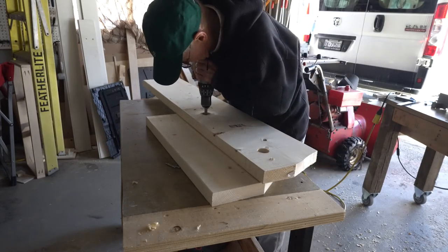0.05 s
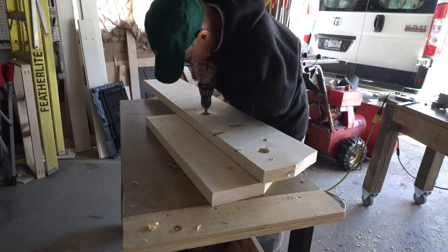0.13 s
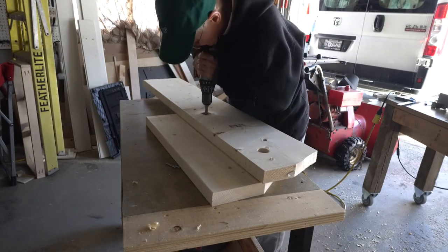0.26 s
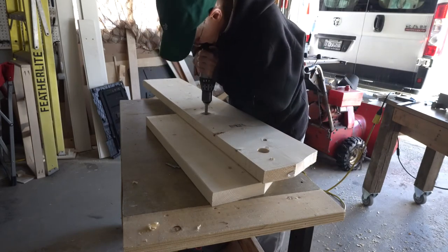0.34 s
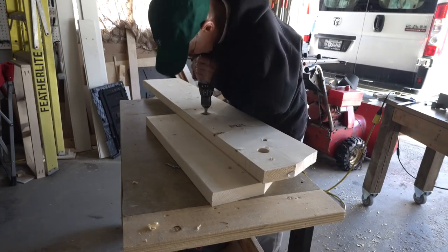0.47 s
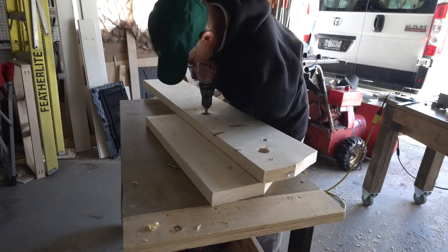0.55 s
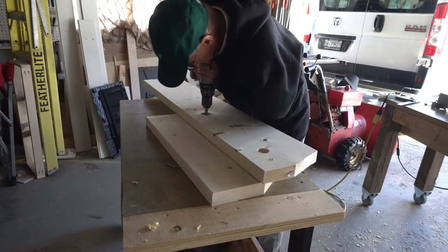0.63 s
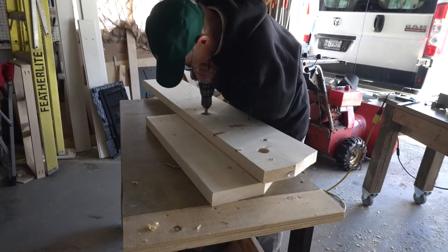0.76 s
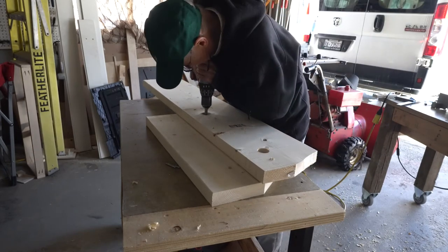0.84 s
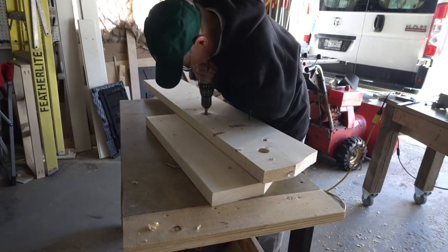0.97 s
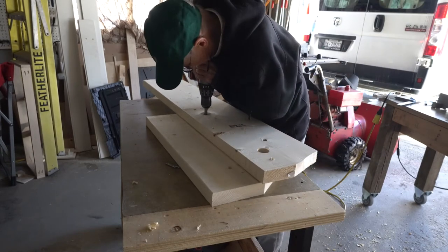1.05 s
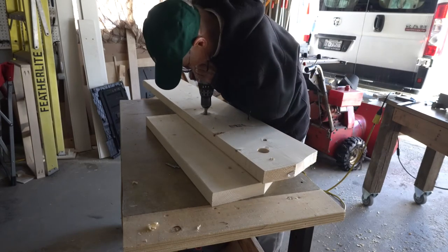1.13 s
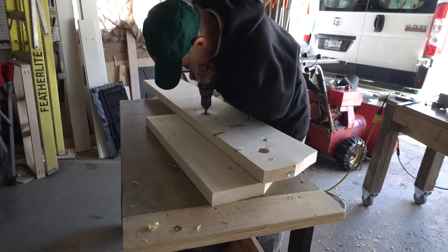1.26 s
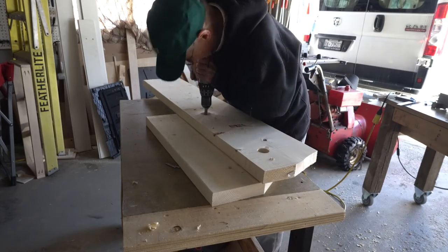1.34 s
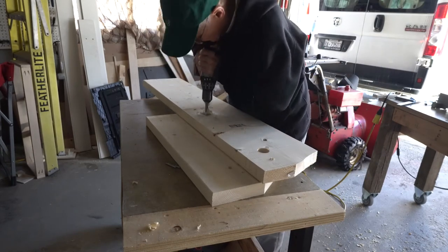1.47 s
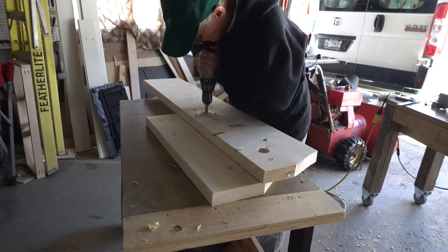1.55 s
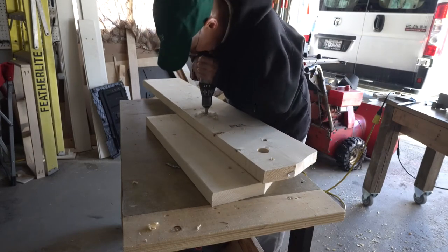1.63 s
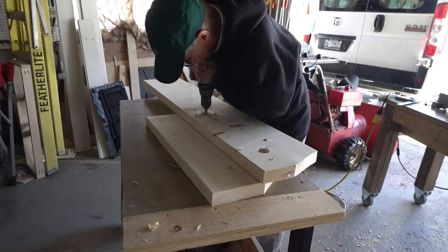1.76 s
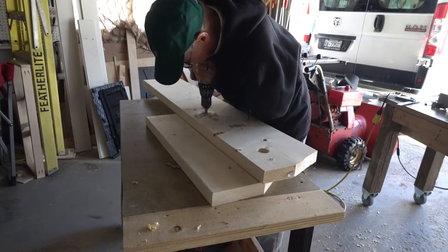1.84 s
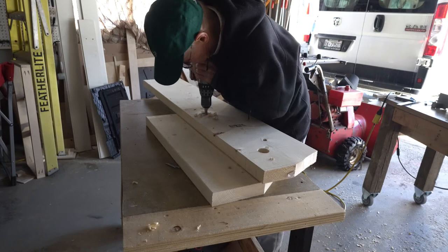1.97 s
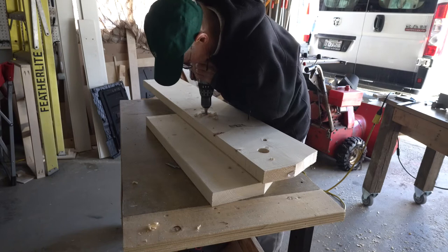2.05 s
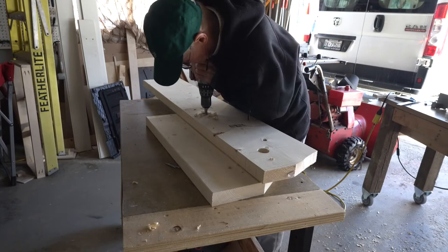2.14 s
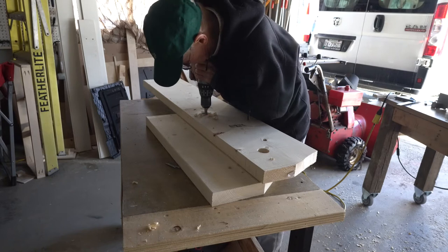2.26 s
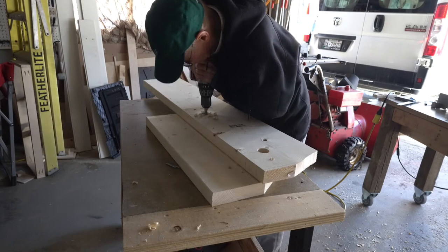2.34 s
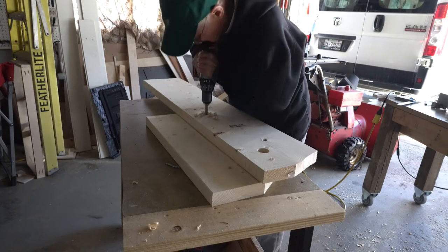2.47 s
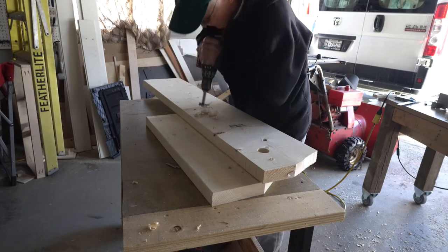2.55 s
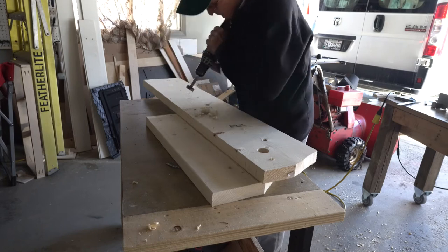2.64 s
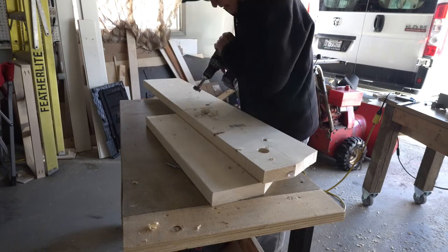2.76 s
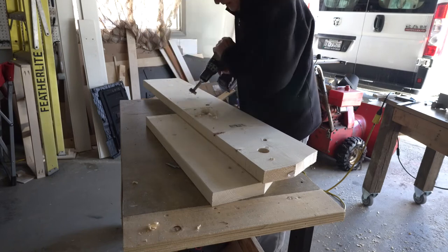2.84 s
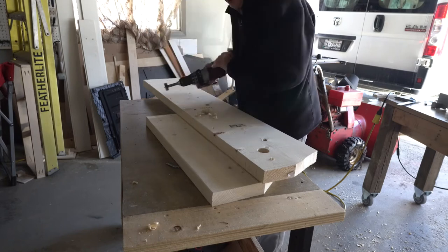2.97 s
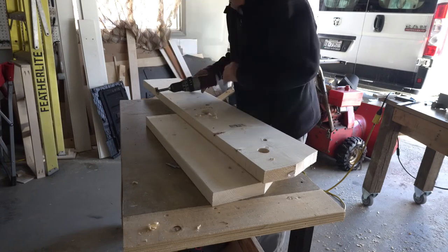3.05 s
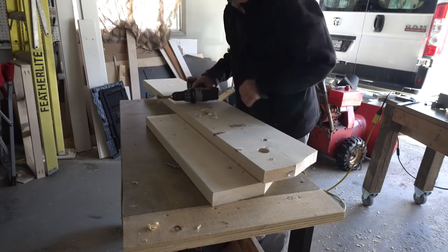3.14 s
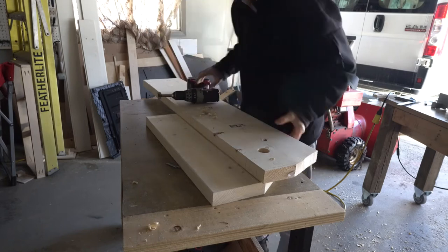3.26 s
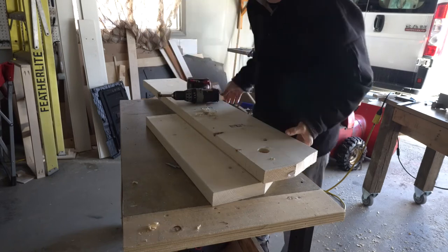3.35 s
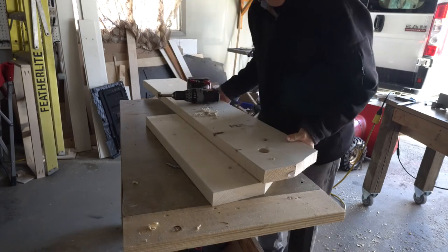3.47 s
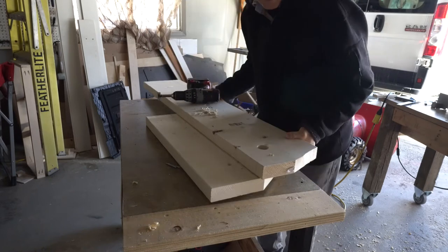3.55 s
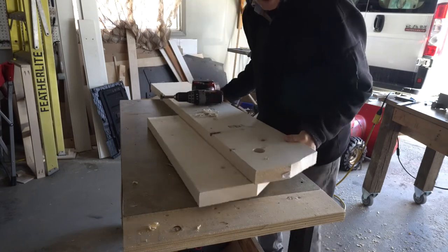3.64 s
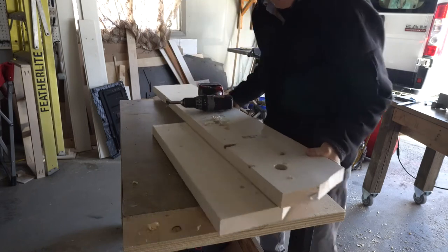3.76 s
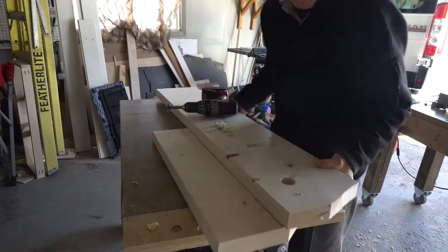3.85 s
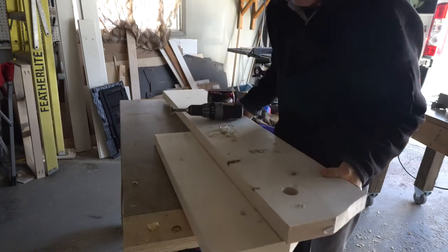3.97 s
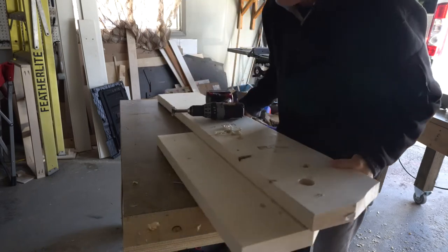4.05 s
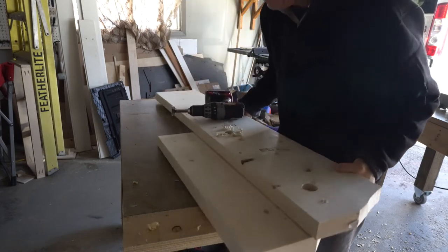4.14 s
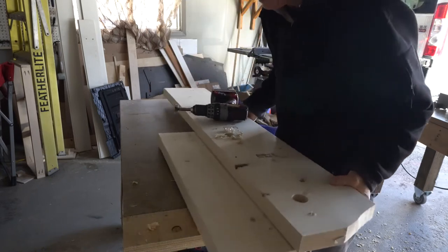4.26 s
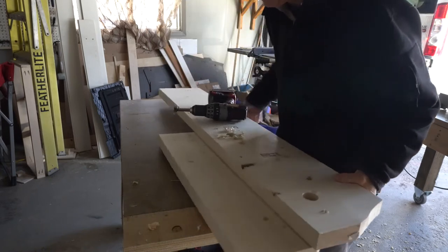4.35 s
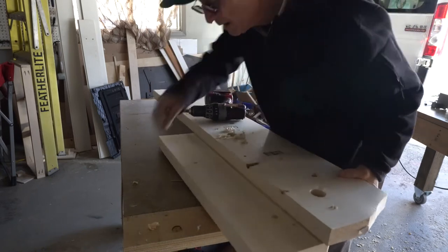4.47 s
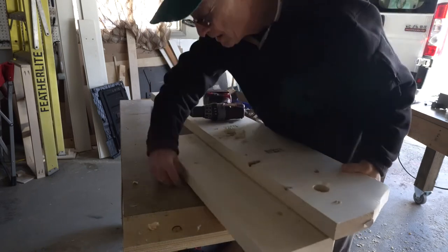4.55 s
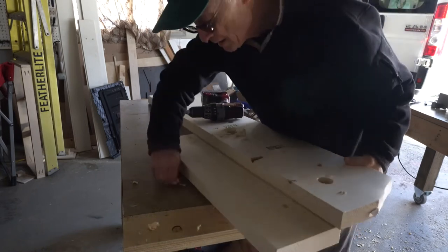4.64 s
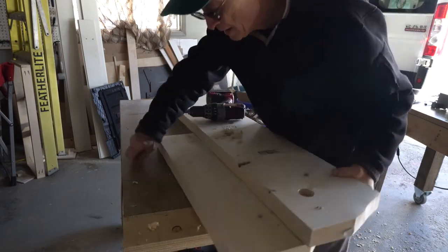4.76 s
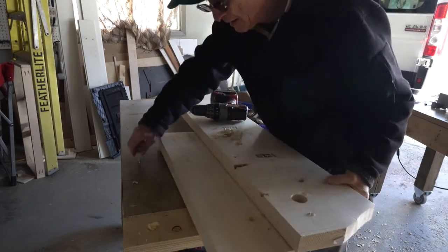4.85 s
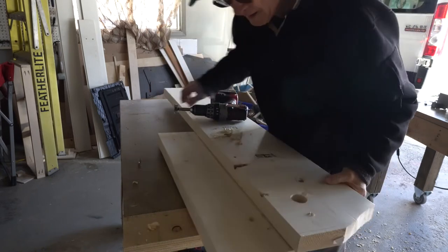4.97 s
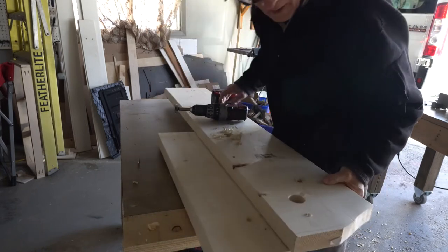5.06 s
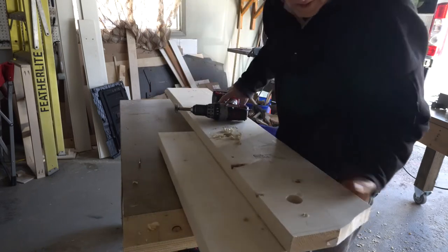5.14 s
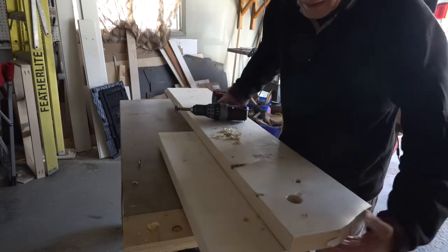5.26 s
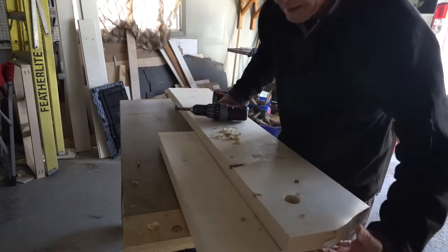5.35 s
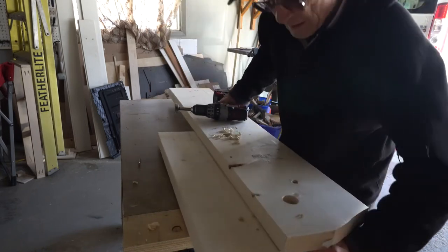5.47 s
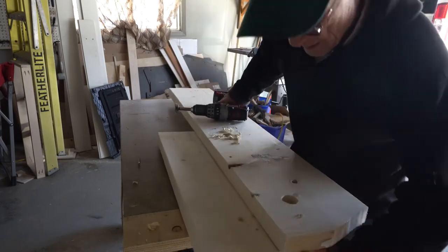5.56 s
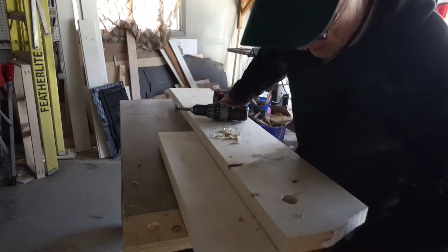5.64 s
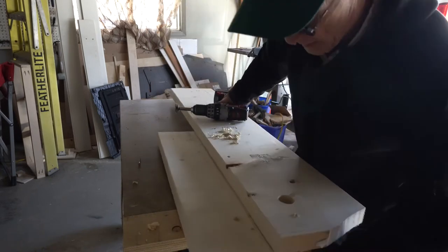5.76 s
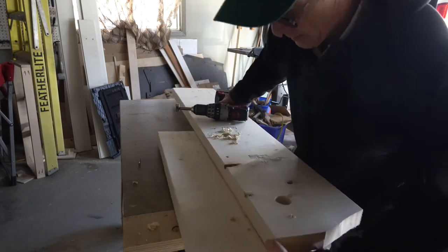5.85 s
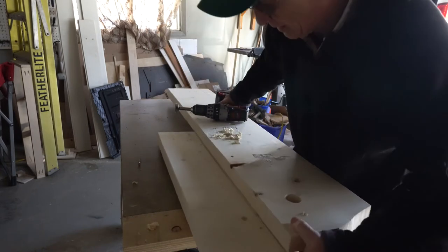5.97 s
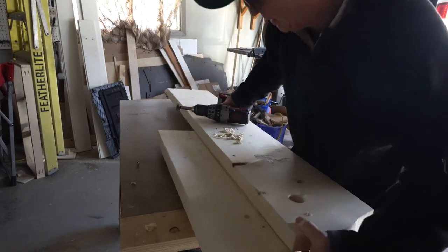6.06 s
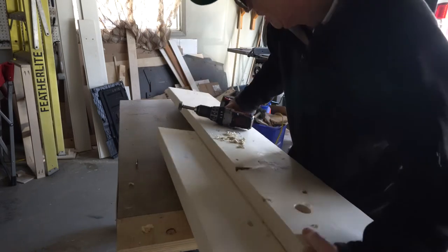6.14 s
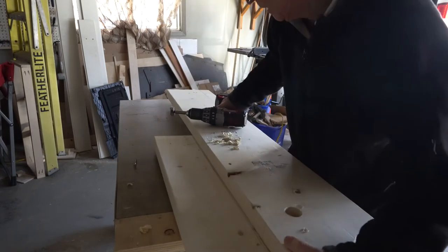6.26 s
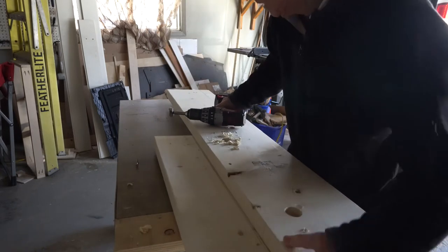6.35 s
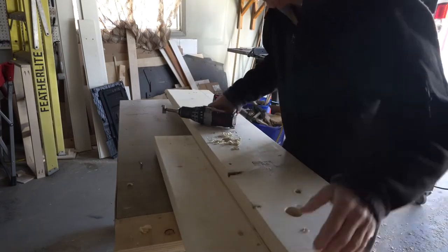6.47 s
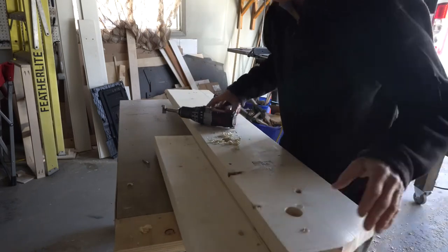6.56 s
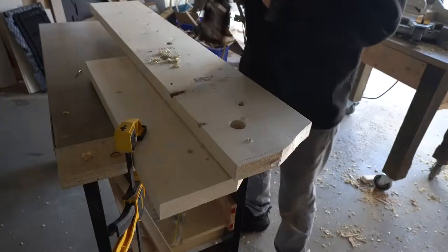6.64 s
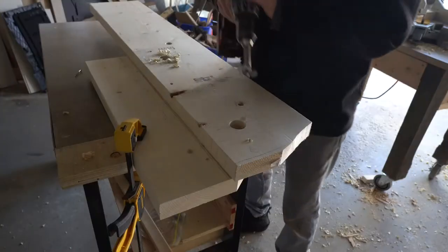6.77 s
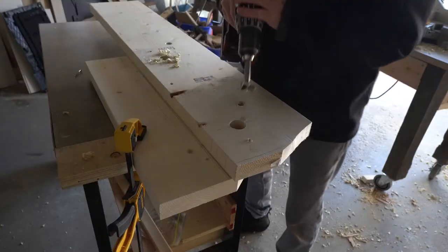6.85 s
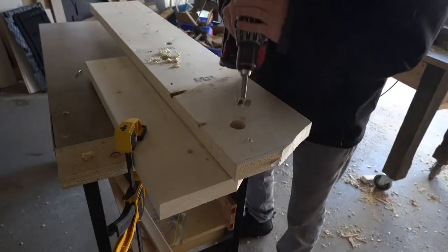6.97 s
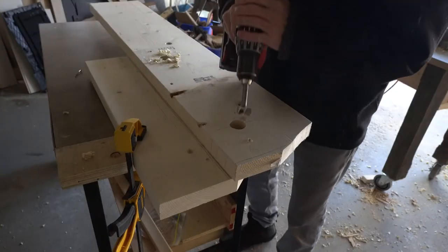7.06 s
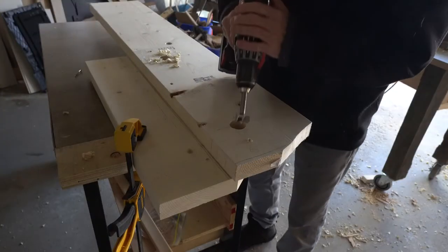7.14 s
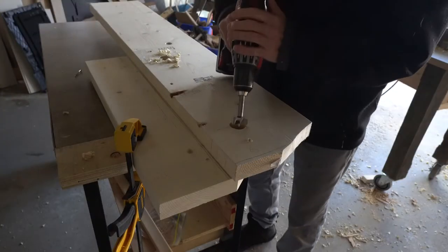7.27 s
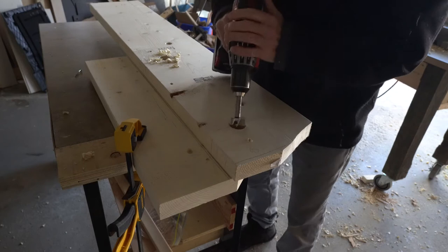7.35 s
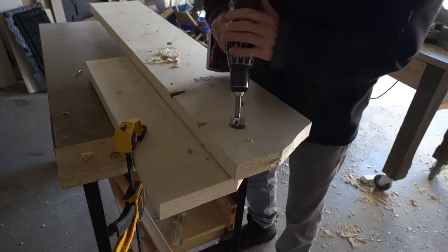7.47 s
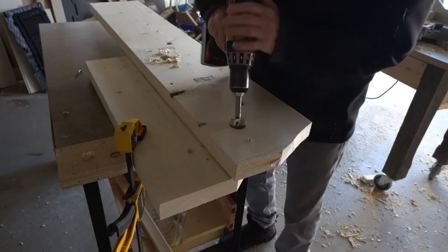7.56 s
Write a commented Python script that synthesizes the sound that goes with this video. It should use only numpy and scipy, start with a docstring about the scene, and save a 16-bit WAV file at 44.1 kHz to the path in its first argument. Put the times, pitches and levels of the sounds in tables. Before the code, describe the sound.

High gear whine and gritty boring into wood, lifting twice between bites, then a tool set down, wooden knocks, scraping and swishing shavings.

```python
"""Workshop, one microphone, the same signal in both channels; a faint air noise lies under everything.
A cordless drill bores a wide bit through a board in three presses, lifted between them. Its gears whine
in tones locked to the motor and hiss; filtered grains make the bit rasp once a turn. As it stops, a faint
gliding tone falls. Then the drill is laid down, boards are dragged and bumped on the bench (noise bursts
ringing wood) and shavings are brushed away (grains and noise). The sound drops out twice after the drill."""
import sys
import numpy as np
from scipy import signal
from scipy.fft import rfft, irfft, next_fast_len
from scipy.io import wavfile

SR = 44100
rng = np.random.default_rng(int(sys.argv[2]) if len(sys.argv) > 2 else 0)


def wav_out(sig):
    """Save sig, one row per channel (or a flat mono array), as 16-bit PCM at SR to the path in sys.argv[1]."""
    wavfile.write(sys.argv[1], SR, np.round(np.clip(np.atleast_2d(sig).T, -1, 1) * 32767).astype(np.int16))


N = 335601

# Spectra set colour only, each scaled to unit power: pitch_hz, level_db (per Hz, relative)
AIR_SPECTRUM = [(25, -19), (70, -13.5), (170, -6.5), (260, -18), (1900, -18.5), (16000, -25)]  # quiet shop
RUMBLE_SPECTRUM = [(25, -19), (60, 1), (120, 8.5), (450, 5), (700, -66)]  # bench under the rubbing
RUB_SPECTRUM = [(300, 4), (500, 5), (1000, 8), (1900, 1), (3000, -1), (5000, -7.5), (9000, -25)]  # wood on wood
BRUSH_SPECTRUM = [(1100, -13), (1800, 8), (2800, 4), (4500, 3.5), (9000, 1), (12000, -0.5), (16000, -2)]  # the finer hiss of the rubbing
GEAR_HISS_SPECTRUM = [(213, -25), (550, -13), (1450, -9), (1620, -13.5), (6000, -14), (8300, -14),
                      (10300, -5.5), (11600, -2.5), (12800, -4.5), (14300, 1), (16000, 2.5)]  # free-running gears
CUT_SPECTRUM = [(230, -47), (340, -5), (480, 3.5), (1000, -2), (2700, -6.5), (9000, -7), (13500, -25),
                (15200, 9.5), (16000, -16)]  # bit in wood, before the board's resonances

AIR_DB = -54.5
# room echo: decay time, level against the direct sound, corner between dull and treble
SHOP_T60_S, SHOP_DB, WALL_CUT_HZ = 0.082, -9.5, 2600

# steady shuffling between the strokes: start_s, rumble_db, rub_db, hiss_db (before the slow fidgeting)
SHUFFLE = [(2.66, -63, -47.5, -67), (3.0, -76, -72, -60), (3.52, -71, -58.5, -53), (4.0, -82, -45.5, -33),
           (4.2, -54, -44.5, -46.5), (4.5, -59, -58, -52), (4.9, -54.5, -49.5, -51), (5.65, -56, -51, -50),
           (6.05, -53, -44.5, -43), (6.45, -49, -44.5, -38), (7.0, -48.5, -41, -47), (7.3, -36.5, -45, -78),
           (7.6, -44, -46, -38)]
# strokes of boards, hands and shavings over wood: start_s, rise_s, hold_s, rub_db, hiss_db
STROKES = [(3.439, 0.014, 0.0071, -45, -41), (3.573, 0.022, 0.027, -43, -35),
           (3.623, 0.082, 0.023, -32.5, -31), (3.703, 0.0058, 0.13, -36.5, -19.5),
           (4.236, 0.019, 0.01, -42, -62), (4.321, 0.028, 0.051, -39.5, -40.5),
           (4.552, 0.021, 0.15, -42.5, -32), (4.662, 0.03, 0.092, -35, -22.5),
           (5.25, 0.0045, 0.012, -46, -32.5), (5.427, 0.027, 0.044, -46.5, -35),
           (5.72, 0.0081, 0.07, -51, -42), (5.936, 0.011, 0.01, -42.5, -36),
           (6.114, 0.012, 0.074, -32.5, -45), (6.552, 0.019, 0.011, -44, -32),
           (7.048, 0.046, 0.0081, -20.5, -27.5), (7.112, 0.022, 0.085, -35.5, -67)]
STROKE_FADE_DB_PER_S = 296
STROKE_RUMBLE_DB = -18  # bench rumble against the rub
# resonances of the rubbed and cracked faces: pitch_hz
FACES = [1870, 2150, 3210, 3820, 4400, 5930, 7850, 8930, 10700, 12400]
# gain of the rubbing's treble: start_s, level_db
TREBLE = [(3.95, -8), (4.5, 2), (5.5, 5), (6.2, -1), (7.0, -6)]

# bumps and knocks: start_s, blow_db, pitch_hz, thud_db, crack_db (relative levels)
KNOCKS = [(0.622, -14, 1000, -65, -10.5), (3.052, -5, 860, -38, -23.5), (3.15, 4.5, 810, -40, -1.5),
          (3.16, -6, 1580, -50, -36), (3.176, -1.5, 1500, -38, -33), (3.707, -13.5, 2470, -40, -3.5),
          (3.746, -15, 2070, -61, -8), (3.823, -11, 2270, -59, -12.5), (3.903, -26, 2000, -64, -27),
          (3.916, -25, 1900, -62, -21), (4.027, -26, 2000, -59, -20), (4.063, 1.5, 1630, -33, -44),
          (4.173, -17, 1060, -32, -23), (4.281, -17.5, 450, -33, -54), (4.294, -24, 1210, -39, -54),
          (4.32, -22.5, 2010, -55, -52), (4.381, -22, 2480, -32, -13.5), (4.39, -20, 2300, -51, -24),
          (4.411, -24.5, 493, -45, -21), (4.538, -23, 2440, -59, -16), (4.579, -21, 2260, -51, -10),
          (4.606, -41, 2820, -57, -20), (4.637, -44, 2300, -52, -14.5), (4.666, 2.5, 2150, -49, -36),
          (4.68, -2.5, 835, -27, -36), (4.807, -5.5, 1340, -27, -40), (4.82, -8.5, 442, -22.5, -49),
          (4.865, -19, 1150, -36, -30), (5.263, -24, 423, -45, -24), (5.32, -35, 2670, -40, -20.5),
          (5.403, -22.5, 2250, -36.5, -25.5), (5.491, -17, 710, -44, -21), (5.497, -22, 424, -38, -8.5),
          (5.738, -46, 2140, -46, -22), (5.821, -22.5, 3040, -43, -50), (5.9, -19.5, 2800, -43, -21),
          (6.116, -9, 1710, -25.5, -45), (6.159, -14, 427, -25, -27), (6.226, -3, 1570, -20, -4.5),
          (6.233, 0.5, 870, -15.5, -30), (6.266, -1.5, 1610, -47, -43), (6.386, 1, 1380, -56, -47),
          (6.81, -32, 470, -35.5, -46), (6.909, -34, 2330, -39, -54), (7.062, -12, 770, -31, -43),
          (7.079, -5.5, 935, -49, -40), (7.092, -4, 855, -41, -25), (7.208, -16, 2360, -33.5, -41),
          (7.211, -7, 440, -12.5, -45), (7.261, -15, 298, -25, -60), (7.367, -15, 585, -20, -61),
          (7.38, -15.5, 3200, -18, -12), (7.453, -31, 2800, -34, -25.5), (7.594, -26, 1020, -37, -44)]
# ring of the boards: pitch_hz, level_db (relative, varied at each blow)
BOARD_MODES = [(420, -4), (570, 2), (690, 0), (815, -2), (1060, -3), (1265, -3), (1570, -4), (1700, -4),
               (1860, -2), (2150, -4), (2780, -8)]
BOARD_T60_S = .05
# ring of the bench: pitch_hz, level_db (relative, varied at each blow), t60_s
BENCH_MODES = [(80.3, -19.5, 0.87), (115.6, -6, 0.12), (162.7, 1.5, 0.11), (188, 1, 0.14), (264, 6, 0.082)]

# faint chirp falling as the chuck stops: start_s, pitch_hz, level_db (before wavering)
CHIRP = [(2.68, 1350, -62), (2.737, 1070, -41), (2.752, 900, -62)]

# motor speed, sagging under load: start_s, gear_mesh_hz (before a slight waver)
MESH = [(0, 6866), (0.13, 6810), (0.21, 7080), (0.3, 7226), (0.45, 7225), (0.59, 6780), (0.86, 6700),
        (0.98, 6790), (1.05, 6690), (1.36, 6860), (1.47, 7180), (1.62, 7229), (1.75, 6950), (1.83, 6790),
        (1.92, 6930), (2.12, 6910), (2.24, 6777), (2.38, 6940), (2.5, 7217)]
TEETH, GEARING = 20, 12  # gear meshes per motor turn, motor turns per chuck turn
FREE_HZ, LOADED_HZ = 7300, 6800  # gear mesh with no load and with full load
# tones on the motor's turn: multiple of the motor speed, level_db (relative, wavering)
FREE_TONES = [(4, -21), (14, -24), (20, -8), (22, -22), (28, -16), (30, -9), (32, -16), (34, -15), (40, -6),
              (42, -18)]
# tones that grow with the load: multiple of the motor speed, level_db (relative, wavering)
LOAD_TONES = [(8.06, -13.5), (10, -22), (45, -6)]
GEARS_DB = -22
RUN_HOLD_S, COAST_DB_PER_S = 2.576, 450  # trigger held, then fade as the brake acts
# the bit pressed into the wood: start_s, hold_s, cutting_db
PRESSES = [(-.1, 0.26, -26), (0.402, 0.97, -26.5), (1.589, 0.814, -26.5)]
BITE_S, LIFT_DB_PER_S = 0.025, 450  # rise as the bit bites, fade as it is lifted
FIRST_BITE, FIRST_BITE_FADE_DB_PER_S = .8, 230  # extra gain as the bit first catches
IDLE_DB = -52.5  # the lifted bit still grazes the hole
# the board sings under the bit: pitch_hz, width_hz, level_db (gain)
BORED_MODES = [(570, 630, -7), (980, 150, 0), (1380, 20, -5), (1706, 63, 8.5), (2243, 110, -0.5)]

# silent stretches: start_s, end_s
DROPOUTS = [(3.143, 3.148), (6.619, 6.661)]
CUTOFF_HZ = 15700


def amp(db):
    """Gain of a level in dB."""
    return 10 ** (np.asarray(db) / 20)


def rms_one(x):
    """Scale to unit power."""
    return x / np.sqrt(np.mean(x ** 2) + 1e-20)


def in_time(rows):
    """Draw each column of a table as a curve over all samples."""
    s, *columns = np.transpose(rows)
    return [np.interp(np.arange(N) / SR, s, c) for c in columns]


def shape(start_s, rise_s, hold_s, fade_db_per_s):
    """Gain that rises, holds, then fades at a steady rate for up to a second."""
    t = np.arange(N) / SR - start_s
    rise = np.clip(t / rise_s, 0, 1) ** 2
    return rise * amp(-fade_db_per_s * np.clip(t - rise_s - hold_s, 0, 1))


def drift(rate):
    """Slow random curve of spread 1, changing about rate times a second."""
    knots_per_s = 400
    knots = rng.standard_normal(int(N / SR * knots_per_s) + 2)
    r = np.exp(-2 * np.pi * rate / knots_per_s)
    slow = signal.lfilter([1], [1, -2 * r, r * r], knots)
    return np.interp(np.arange(N) * knots_per_s / SR, np.arange(len(slow)), rms_one(slow))


def coloured(x, spectrum):
    """Shape x to a spectrum of pitch_hz, level_db, dark outside it; unit power."""
    size = next_fast_len(N)
    hz, level_db = np.transpose(spectrum)
    log_hz = np.log(np.arange(size // 2 + 1) * SR / size + 1)
    gain = amp(np.interp(log_hz, np.log(hz), level_db, left=-80, right=-80))
    return rms_one(irfft(rfft(x, size) * gain, size)[:N])


def grains(per_s, spread_db):
    """Random clicks of uneven size and either sign; unit power."""
    sizes = amp(spread_db * np.minimum(rng.exponential(1, N), 4)) * rng.choice([-1, 1], N)
    return rms_one(sizes * (rng.random(N) < per_s / SR))


def ring(clicks, hz, t60):
    """A unit click sets a decaying sine of starting height 1 ringing."""
    r, w = amp(-60 / (t60 * SR)), 2 * np.pi * hz / SR
    return signal.lfilter([0, np.sin(w)], [1, -2 * r * np.cos(w), r * r], clicks + 1e-18)


def struck(modes, contact):
    """A contact force rings a set of modes, each with a fresh strength."""
    return sum(amp(db + 2.5 * rng.standard_normal()) * ring(contact, hz, t60)
               for hz, db, t60 in modes)


def resonance(x, hz, width_hz):
    """Band-pass with a peak gain of 1."""
    r = np.exp(-np.pi * width_hz / SR)
    poles = [1, -2 * r * np.cos(2 * np.pi * hz / SR), r * r]
    return signal.lfilter(np.array([1, 0, -1]) * (1 - r * r) / 2, poles, x)


def filtered(x, order, hz, kind="low"):
    """Butterworth filter."""
    return signal.sosfilt(signal.butter(order, hz, kind, fs=SR, output="sos"), x)


def shop_air():
    """The quiet shop: steady coloured noise."""
    return amp(AIR_DB) * coloured(rng.standard_normal(N), AIR_SPECTRUM)


def shop_echo(x):
    """Echoes of the shop: convolution with noise that dies away, the treble sooner."""
    t = np.arange(int(.6 * SR)) / SR
    noise = rng.standard_normal(len(t)) * np.clip(t / 0.047, 0, 1)
    dull = filtered(noise, 1, WALL_CUT_HZ)
    tail = dull * amp(-60 * t / SHOP_T60_S)
    tail += (noise - dull) * amp(-60 * t / (0.88 * SHOP_T60_S))
    return signal.fftconvolve(x, tail / np.sqrt(np.sum(tail ** 2)))[:N]


def handling():
    """Wood rubbing on wood: dense slips in two colours with grit and squeaks, and the bench rumbling."""
    # the shuffling fades in, then comes and goes
    on = np.clip((np.arange(N) / SR - SHUFFLE[0][0]) / 0.032 + 1, 0, 1)
    rumble_gain, rub_gain, hiss_gain = (on * amp(db) for db in in_time(SHUFFLE))
    fidget = amp(2.0 * drift(12))
    rub_gain, hiss_gain = rub_gain * fidget, hiss_gain * fidget

    strokes = np.array([shape(s, rise, hold, STROKE_FADE_DB_PER_S) for s, rise, hold, *_ in STROKES])
    rubbing, hissing = amp(np.transpose(STROKES)[3:]) @ strokes

    slips = amp(2.2 * drift(25))
    grit = amp(-3) * grains(450 * slips ** 2, spread_db=2.0)
    rub = coloured((rng.standard_normal(N) + grit) * slips, RUB_SPECTRUM)
    brush = coloured((grains(9000, spread_db=-2.0) + grit) * slips, BRUSH_SPECTRUM)
    # narrow resonances of the rubbed faces come and go
    squeak = sum(amp(7.0 * drift(11)) * resonance(brush, hz, hz / 20) for hz in FACES)
    brush = rms_one(brush + amp(-3) * rms_one(squeak))
    # zero-phase split, so that only the treble changes level
    below = signal.sosfiltfilt(signal.butter(4, 9800, fs=SR, output="sos"), brush)
    treble_db, = in_time(TREBLE)
    brush = below + amp(treble_db) * (brush - below)

    rumble = coloured(rng.standard_normal(N), RUMBLE_SPECTRUM)
    rumble_gain = rumble_gain + amp(STROKE_RUMBLE_DB) * rubbing
    return rumble_gain * rumble + (rub_gain + rubbing) * rub + (hiss_gain + hissing) * brush


def knocks():
    """Each blow: a rattling contact, heard dull around its own pitch, in the boards and bench, and as a crack."""
    out, t = np.zeros(N), np.arange(int(.45 * SR)) / SR
    push = np.exp(-t / 0.00087) / (0.002 * SR)  # the soft shove that the bench feels
    board = [(hz, db, BOARD_T60_S) for hz, db in BOARD_MODES]
    contact_decay = amp(-60 * t / 0.024) + 0.18 * amp(-60 * t / 0.19)
    crack_decay = amp(-60 * t / 0.011) + 0.11 * amp(-60 * t / 0.15)
    crack_swell = np.clip(t / 0.0012, 0, 1)
    for s, blow_db, pitch_hz, thud_db, crack_db in KNOCKS:
        noise = rng.standard_normal((2, len(t)))
        contact = noise[0] * contact_decay
        # a soft contact cuts steeply above its pitch, gently below
        dull = filtered(resonance(contact, pitch_hz, 1.26 * pitch_hz), 3, 1.46 * pitch_hz)
        dull = filtered(dull, 2, 0.28 * pitch_hz, "high")
        # the filtered contact favours board modes near the blow's pitch
        blow = amp(blow_db + 7) * dull + amp(blow_db - 35) * struck(board, dull)
        blow += amp(thud_db + 3.0) * struck(BENCH_MODES, push)
        # the crack is coloured by the face resonances, at random strengths for each blow
        crack = filtered(noise[1], 2, [2800, 10000], "band")
        faces = sum(amp(6 * rng.standard_normal()) * resonance(crack, hz, 600) for hz in FACES)
        blow += amp(crack_db) * rms_one(crack + faces) * crack_swell * crack_decay
        at = round(s * SR)
        out[at:at + len(t)] += blow[:N - at]
    # a high-pass keeps the deepest bass out of the knocks
    return filtered(out, 3, 62, "high")


def chirp():
    """A short falling tone, wavering in pitch and level."""
    hz, level_db = in_time(CHIRP)
    t = np.arange(N) / SR
    sounding = (t > CHIRP[0][0]) & (t < CHIRP[-1][0])
    level = amp(level_db + 6 * drift(120))
    phase = 2 * np.pi * np.cumsum(hz * (1 + 0.031 * drift(57))) / SR
    return level * np.sin(phase) * sounding


def gear_tones(turns, table):
    """Sines on multiples of the motor's turn, each wavering slowly and quickly in level."""
    return sum(amp(db + 1.95 * drift(23) + 2.33 * drift(160))
               * np.sin(2 * np.pi * (k * turns + rng.random())) for k, db in table)


def bit_in_wood(turns, load):
    """Grains as torn fibres: the bite swells once a chuck turn and sets the board's resonances singing."""
    # across the grain the bit bites harder: a swell each turn, its overtones, and chance
    chuck = 2 * np.pi * turns / GEARING
    bite_db = 4.5 * np.sin(chuck) + 2.2 * np.sin(2 * chuck + 1) + 2.5 * np.sin(3 * chuck + 1)
    bite = amp(bite_db + 1.8 * drift(22))
    fibres = coloured(grains(4000, spread_db=1.0), CUT_SPECTRUM)
    # the bite shakes the board; the fine rasp above grows with the load
    deep = filtered(fibres, 2, 3000)
    torn = rms_one(deep * bite) * np.std(deep) + (fibres - deep) * load ** 0.46
    singing = sum(amp(db) * resonance(torn, hz, width) for hz, width, db in BORED_MODES)
    return rms_one(torn + singing)


def drill():
    """Motor turns drive the gear tones, the throbbing gear hiss and the bit; speed sag sets the load."""
    mesh_hz, = in_time(MESH)
    turns = np.cumsum(mesh_hz * (1 + .003 * drift(20)) / TEETH) / SR
    load = np.clip((FREE_HZ - mesh_hz) / (FREE_HZ - LOADED_HZ), .1, 1)

    # the rise starts ahead of time zero, so the drill is already running
    running = shape(-0.986, 1, RUN_HOLD_S, COAST_DB_PER_S)
    cutting = amp(IDLE_DB) * running
    for s, hold, db in PRESSES:
        press = shape(s, BITE_S, hold, LIFT_DB_PER_S)
        catch = FIRST_BITE * shape(s, BITE_S, 0, FIRST_BITE_FADE_DB_PER_S)
        cutting = cutting + amp(db) * (press + catch)

    free = gear_tones(turns, FREE_TONES)
    loaded = gear_tones(turns, LOAD_TONES)
    # the hiss throbs with each motor turn
    throb = amp(2.0 * np.sin(2 * np.pi * turns) + 1.2 * drift(31))
    hiss = coloured(rng.standard_normal(N) * throb, GEAR_HISS_SPECTRUM)
    gears = amp(GEARS_DB) * running * (free + load * loaded + hiss)
    return gears + cutting * bit_in_wood(turns, load)


def scene():
    """One microphone: drill, chirp and knocks with the shop's echo; handling and air without it."""
    near = drill() + chirp() + knocks()
    mono = near + amp(SHOP_DB) * shop_echo(near) + handling() + shop_air()
    return np.array([mono, mono])


def record(dry):
    """Short silences, then clipped peaks, then a steep cut of the top."""
    t = np.arange(N) / SR
    gate = np.prod([np.clip(np.maximum(a - t, t - b) / 0.00045, 0, 1) for a, b in DROPOUTS], axis=0)
    clipped = np.clip(dry * gate, -.97, .97)
    top_cut = signal.ellip(12, .5, 65, CUTOFF_HZ, fs=SR, output="sos")
    return signal.sosfilt(top_cut, clipped)


dry = scene()
out = record(dry)
wav_out(out)
```